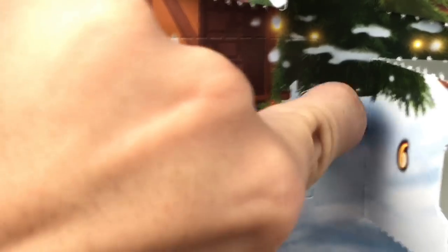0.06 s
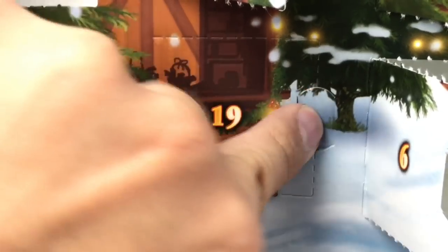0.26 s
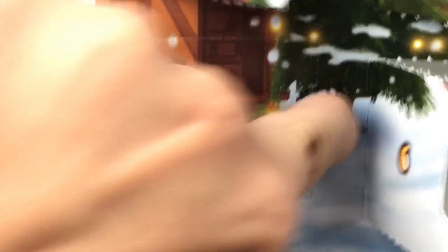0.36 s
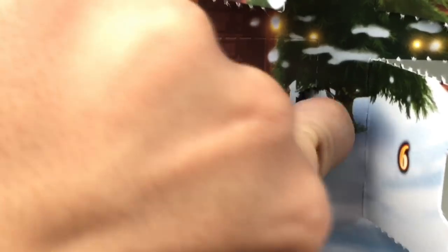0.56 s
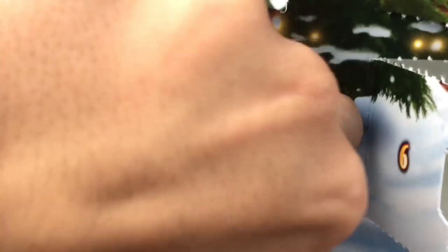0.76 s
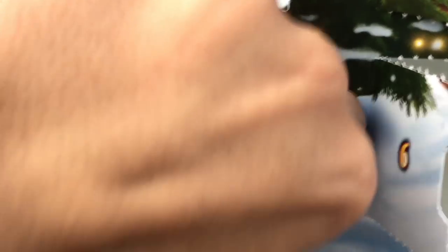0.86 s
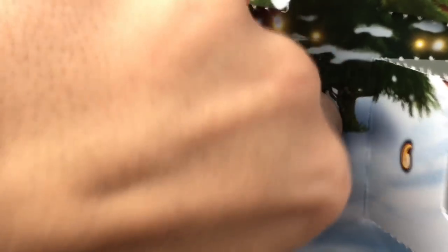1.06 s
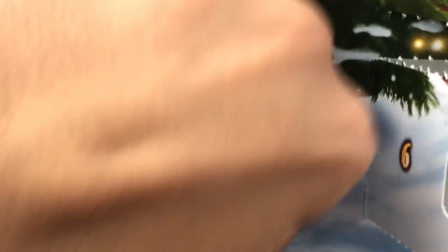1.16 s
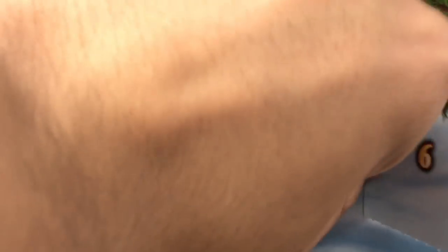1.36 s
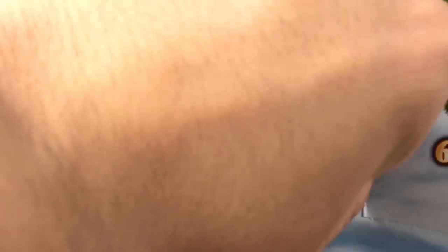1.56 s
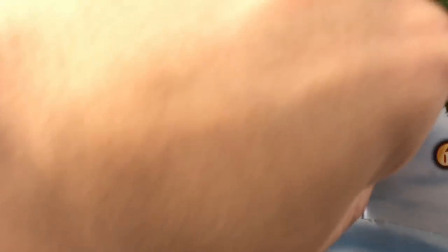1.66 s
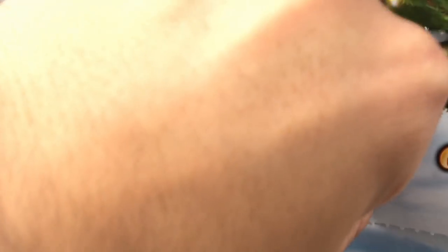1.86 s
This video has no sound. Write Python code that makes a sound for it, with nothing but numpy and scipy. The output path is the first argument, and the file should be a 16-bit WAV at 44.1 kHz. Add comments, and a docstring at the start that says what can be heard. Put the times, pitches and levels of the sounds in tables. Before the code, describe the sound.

Close, dry sound of a small cardboard door being pushed in on a hollow box; light rustling, popping card, quick snaps with dull knocks, a quieter lull, then a thick burst of papery crackles and scrapes in a quiet room.

```python
"""A thumb pushes in and tears open a perforated cardboard door on a hollow box, close to the microphone.
All along, a quiet room hisses, the hand rumbles and bumps on the box, and fibres rustle and crackle.
First the card pops over the hollow behind it, as ticks that set tuned tones ringing.
Then bridges of card snap: each gives a bright tick, and a moment later the flap thumps and the box rings.
After the snaps come a thick patch of crackles and a few more pops; card also scrapes on card now and then."""
import sys
import numpy as np
from scipy import signal
from scipy.fft import rfft, irfft
from scipy.io import wavfile

SR = 44100
rng = np.random.default_rng(int(sys.argv[2]) if len(sys.argv) > 2 else 0)


def int16_out(signal):
    """Quantize to a 16-bit WAV file."""
    q = np.round(np.clip(np.atleast_2d(signal).T, -1, 1) * 32767)
    wavfile.write(sys.argv[1], SR, q.astype(np.int16))


N = 83790  # length in samples


def from_db(db):
    """Turn a level in dB into a gain."""
    return 10 ** (np.asarray(db) / 20)


def rms_one(x):
    """Scale x to an rms (average strength) of 1."""
    return x / np.sqrt(np.mean(x ** 2) + 1e-20)


def curve(rows, column):
    """Join the points of one table column with straight lines, giving a value per sample."""
    rows = np.array(rows)
    return np.interp(np.arange(N) / SR, rows[:, 0], rows[:, column])


def coloured(x, spectrum):
    """Filter x by a spectrum, 60 dB down below its first row; rms 1."""
    hz, db = np.transpose(spectrum)
    log_hz = np.log(np.maximum(np.fft.rfftfreq(N, 1 / SR), 10))
    gain = from_db(np.interp(log_hz, np.log(hz), db, -60))
    return rms_one(irfft(rfft(x) * gain, N))


def band(x, low_hz, high_hz):
    """Keep the part of x between two frequencies."""
    edges = [low_hz, min(high_hz, .45 * SR)]
    return signal.sosfilt(signal.butter(2, edges, "band", fs=SR, output="sos"), x)


def ring(x, modes, turn=-1):
    """Let x strike a set of fading tones (modes), with alternating signs unless turn is 1."""
    out = 0
    for k, (hz, db, t60) in enumerate(modes):
        r = from_db(-60 / (t60 * SR))  # fade per sample
        w = 2 * np.pi * hz / SR
        tone = signal.lfilter([0, np.sin(w)], [1, -2 * r * np.cos(w), r * r], x + 1e-18)
        out = out + turn ** k * from_db(db) * tone
    return out


def clicks(s, db):
    """Place one-sample clicks at times s in seconds."""
    out = np.zeros(N)
    np.add.at(out, np.clip((s * SR).astype(int), 0, N - 1), from_db(db))
    return out


def splinters(s, db, ms):
    """Break card: a first click, then four at random times within ms, each 4 to 10 dB weaker."""
    draw = rng.random((len(s), 8))
    out = clicks(s, db)
    for k in range(4):
        later = s + draw[:, k] * np.abs(ms) / 1000
        out = out + (-1) ** k * clicks(later, db - 4.0 - 6 * draw[:, 4 + k])
    return out


def tail(s, db, t60):
    """Noise that starts at each time and fades by 60 dB in t60 seconds."""
    r = from_db(-120 / (t60 * SR))  # fade of the squared loudness per sample
    power = signal.lfilter([1], [1, -r], clicks(s, db) ** 2 + 1e-18)
    return np.sqrt(power) * rng.standard_normal(N)


def after_sound(s, tick_db, body_db):
    """Noisy after-sound of a break: a short bright tail and a longer dull one."""
    bright = tail(s, tick_db - 5, 0.048)
    dull = tail(s, body_db - 9.5, 0.11)
    return band(bright, 2500, 7400) + band(dull, 282, 1074)


def dying(s, db, t60):
    """Loudness that jumps up at each time and fades by 60 dB in t60 seconds."""
    t = np.arange(N) / SR
    return sum(np.where(t >= start, from_db(level - 60 * np.maximum(t - start, 0) / abs(fade)), 0)
               for start, level, fade in zip(s, db, t60))


def swelling(s, length, db):
    """Loudness made of smooth humps centred on times s."""
    t = np.arange(N) / SR
    return sum(from_db(level) * np.cos(np.pi * np.clip((t - middle) / width, -.5, .5)) ** 2
               for middle, width, level in zip(s, length, db))


# Colour of the room hiss. Each row: frequency in Hz, relative level in dB per Hz.
ROOM_COLOUR = [(18, -52), (30, -19), (239, -12.5), (336, 0), (844, 1.5), (1590, -14.5), (2350, -12.5),
               (3580, -14.5), (4530, -15), (14800, -23.5), (16000, -24)]


def room():
    """A quiet room: steady noise with a fixed colour."""
    return from_db(-61.5) * coloured(rng.standard_normal(N), ROOM_COLOUR)


# Loudness of the hand on the box. Each row: time in seconds, level in dB.
HAND_LOUDNESS = [(0.0, -52.5), (0.226, -51.5), (0.418, -46), (0.492, -47), (0.82, -51.5), (0.968, -49.5),
                 (1.058, -45), (1.232, -50.5), (1.418, -53), (1.592, -51), (1.9, -53)]


def handling():
    """The hand on the box: low noise whose loudness drifts."""
    rumble = rms_one(band(rng.standard_normal(N), 55, 245))
    return from_db(curve(HAND_LOUDNESS, 1)) * rumble


# Knuckle bumps. Each row: start in seconds, pitch in Hz, level in dB, time to fade by 60 dB in seconds.
KNUCKLE_BUMPS = [(0.111, 145, -29, 0.06), (0.251, 65.4, -26.5, 0.06), (0.296, 58.1, -34, 0.078),
                 (0.443, 67.5, -21.5, 0.064), (0.445, 235, -30.5, 0.059), (0.717, 70, -38, 0.075),
                 (1.047, 63, -33.5, 0.086), (1.1, 224, -29, 0.023), (1.151, 316, -32, 0.027),
                 (1.176, 156, -35, 0.13), (1.177, 235, -36, 0.14), (1.443, 242, -32.5, 0.033),
                 (1.59, 134, -29.5, .12), (1.595, 255, -31.5, 0.14)]


def bumps():
    """Knuckles bump the box: each soft knock is one low tone that fades."""
    return sum(ring(clicks(np.array([s]), db), [(hz, 0, t60)]) for s, hz, db, t60 in KNUCKLE_BUMPS)


# High tones of the card edge. Each row: pitch in Hz, level in dB, time to fade by 60 dB in seconds.
EDGE_TONES = [(3585, 1, 0.0082), (3990, 0, 0.0093), (5200, -9, 0.013), (5605, -3, 0.01),
              (6435, 0.5, 0.0067), (7080, -5.5, 0.0095), (8810, -1.5, 0.0031), (11240, -12.5, 0.0076),
              (12360, -11.5, 0.0096), (14600, -11.5, 0.0069)]


def ring_edge(x):
    """The card edge answers x with short, high tones."""
    return ring(x, EDGE_TONES)


# Tones of the hollow behind the door. Each row: pitch in Hz, level in dB, time to fade by 60 dB in seconds.
HOLLOW_TONES = [(2412, 5.5, 0.012), (2530, 5, .012), (3110, -1.5, 0.015), (3312, 2.5, 0.014),
                (4790, 6, 0.0044), (3533, 3.5, 0.012), (3876, 5.5, 0.013)]


def ring_hollow(x, part=slice(None), turn=-1):
    """The hollow answers x with all its tones, or only a part of them."""
    return ring(x, HOLLOW_TONES[part], turn)


# Tones of the door's body. Each row: pitch in Hz, level in dB, time to fade by 60 dB in seconds.
DOOR_TONES = [(578, 2, 0.026), (869, -1.5, 0.039), (962.4, 1, 0.031), (1125, 8, 0.0078), (1342, 1, 0.017),
              (1766, -0.5, 0.015)]


def ring_door(x):
    """The body of the door answers x with lower tones."""
    return ring(x, DOOR_TONES)


def fibre_grains():
    """Dense tiny clicks of uneven size and random sign, louder and softer in clumps."""
    per_second, spread_db, patchy_db, patch_ms = 12000, 3, 2, 3.2
    sizes = from_db(spread_db * np.minimum(rng.exponential(1, N), 5)) * rng.choice([-1, 1], N)
    slow = np.exp(-1000 / (patch_ms * SR))
    clumps = rms_one(signal.lfilter([1], [1, -slow], rng.standard_normal(N)))
    return sizes * (rng.random(N) < per_second / SR) * from_db(patchy_db * clumps)


# Colour of rubbing fibres. Each row: frequency in Hz, relative level in dB per Hz.
FIBRE_COLOUR = [(530, -38), (900, -8), (1420, -11), (1810, 0.5), (2300, -6), (2540, -1.5), (3550, -3),
                (4200, -4), (4570, -9.5), (6970, -8.5), (7770, -12), (16000, -13)]


def fibres(grains):
    """The grains as rubbing fibres, rms 1."""
    return coloured(grains, FIBRE_COLOUR)


# Colour of the duller noise of the card. Each row: frequency in Hz, relative level in dB per Hz.
CARD_COLOUR = [(120, -31), (200, 4), (481, 1), (681, 2), (757, -1), (1040, 0.5), (1490, -8.5),
               (1730, -11.5), (2500, -50)]


def dull_noise():
    """Smooth noise below the treble of the fibres, rms 1."""
    return coloured(rng.standard_normal(N), CARD_COLOUR)


def dull_rub(loudness, dull):
    """Shape the dull noise in time, then keep its middle frequencies."""
    return band(loudness * dull, 215, 2222.2)


def bright_rub(loudness, grains):
    """Grains heard as fibres and through the tones of the edge and the hollow."""
    edge, hollow = rms_one(ring_edge(grains)), rms_one(ring_hollow(grains))
    return loudness * (.5 * fibres(grains) + from_db(-10) * edge + from_db(-7.5) * hollow)


# Loudness of rubbing fibres. Each row: time in seconds, treble level in dB, middle level in dB.
FIBRE_LOUDNESS = [(0.0, -66, -47), (0.084, -68, -63.5), (0.29, -52.5, -63), (0.418, -55, -58),
                  (0.522, -52.5, -57), (0.612, -56, -57.5), (0.776, -53, -59), (0.904, -54.5, -53),
                  (1.036, -51, -49), (1.21, -57, -65.5), (1.412, -52, -53), (1.528, -56.5, -57),
                  (1.65, -58, -50.5), (1.766, -71, -65), (1.9, -56, -48)]


def rustle(grains, dull):
    """Fibres rub all the time: grains with a little of the hollow, and dull noise below."""
    rub = fibres(grains) + from_db(-28) * rms_one(ring_hollow(grains))
    treble = from_db(curve(FIBRE_LOUDNESS, 1)) * rub
    return treble + dull_rub(from_db(curve(FIBRE_LOUDNESS, 2)), dull)


# Card scraping on card. Each row: middle of the scrape in seconds, length in seconds,
# treble level in dB, middle-range level in dB, level of the edge's ring in dB.
CARD_SCRAPES = [(0.461, 0.11, -49.5, -43.5, -51.5), (1.038, 0.051, -39.5, -40.5, -47.5),
                (1.585, 0.028, -34.5, -55, -45), (1.612, 0.068, -36.5, -40, -61),
                (1.728, 0.049, -64, -45, -66), (1.368, 0.12, -62, -71, -61)]


def scrapes(grains, dull):
    """Card scrapes on card: bright and dull rubbing and a ringing edge swell and fade together."""
    s, length, treble_db, middle_db, edge_db = np.transpose(CARD_SCRAPES)
    edge = rms_one(band(rms_one(ring_edge(grains)), 5050, 6600))
    return (bright_rub(swelling(s, length, treble_db), grains)
            + dull_rub(swelling(s, length, middle_db), dull)
            + swelling(s, length, edge_db) * edge)


# Small crackles. Each row: start in seconds, treble level in dB, middle level in dB,
# basic fading time in seconds (the treble takes 0.7 of it, the middle 0.92, to fade by 60 dB).
SMALL_CRACKLES = [(0.015, -47.5, -40, 0.055), (.040, -46, -45.5, 0.015), (0.047, -52.5, -47, 0.22),
                  (0.111, -56.5, -43.5, 0.047), (0.218, -83, -46, 0.2), (.301, -41, -46.5, 0.015),
                  (0.38, -47, -35, 0.053), (0.404, -37.5, -42, 0.093), (0.425, -36, -58, 0.054),
                  (0.4359, -47, -21.5, 0.017), (.442, -31.5, -47, 0.033), (0.672, -47, -45, 0.018),
                  (0.956, -42.5, -64, 0.052), (1.007, -54, -40.5, 0.035), (1.133, -65, -43.5, 0.017),
                  (1.171, -46, -37, 0.088), (1.206, -38.5, -39.5, 0.043), (1.241, -50, -41.5, 0.024),
                  (1.28, -61, -42, 0.015), (1.435, -46, -32.5, 0.014), (1.443, -38, -32, 0.0095),
                  (1.447, -43, -35.5, 0.041), (1.458, -44, -37, 0.018), (1.463, -44, -44, 0.017),
                  (1.4695, -43, -38, 0.022), (1.476, -50, -48, 0.017), (1.501, -35, -35.5, 0.033),
                  (1.511, -41, -41, 0.064), (1.524, -32, -31, 0.03), (1.540, -42, -32.5, 0.036),
                  (1.5522, -37, -46, 0.048), (1.569, -43, -55, 0.027), (1.615, -38.5, -59, 0.034),
                  (1.661, -60, -42, 0.065), (1.7195, -41, -43, 0.02), (1.724, -38.5, -43, 0.023),
                  (1.734, -47.5, -48, 0.026), (1.794, -58, -46.5, 0.067), (1.825, -42, -37, 0.013),
                  (1.837, -54, -39, 0.066), (1.870, -49, -38, 0.016), (1.879, -44, -42, 0.024),
                  (1.891, -45, -52, 0.0092)]


def crackle_starts():
    """Each crackle begins with small breaks that strike the edge, the door and the hollow."""
    s, treble_db, middle_db, _ = np.transpose(SMALL_CRACKLES)
    edge = ring_edge(splinters(s, treble_db - 6, 1.3))
    door = ring_door(splinters(s, middle_db - 9, 2.2))
    hollow = ring_hollow(splinters(s, treble_db - 11.5, 1.9))
    return edge + door + hollow


def crackle_fades(grains, dull):
    """Each crackle goes on as bright and dull rubbing that dies away."""
    s, treble_db, middle_db, fade = np.transpose(SMALL_CRACKLES)
    bright = bright_rub(dying(s, treble_db, fade * 0.7), grains)
    return bright + dull_rub(dying(s, middle_db, fade * 0.92), dull)


# Pops over the hollow. Each row: start in seconds, tick level in dB, level in dB of the hollow's
# first five tones, of its sixth tone, of its seventh tone, level of the door's body in dB,
# length of the tick in milliseconds, delay of the ringing in milliseconds.
HOLLOW_POPS = [(0.2461, -21.5, -9, -18, -13, -17, 1.2, 1.23),
               (.4281, -21.5, -40, -9.5, -15, -22.5, 1.08, 0.2),
               (.4310, -27, -30, -16.5, -25.5, -30, 0.97, .058), (1.5858, -27, -25, -42, -44, -36, 4.7, .6),
               (1.6023, -25, -16.5, -43, -38, -25.5, 1.7, 1.07),
               (1.6072, -43, -28, -42, -50, -41, 2.1, 0.55)]


def pops():
    """The card pops over the hollow: a tick, then one blow rings the hollow and the door."""
    s, tick_db, five_db, sixth_db, seventh_db, body_db, ms, lag_ms = np.transpose(HOLLOW_POPS)
    late = s + lag_ms / 1000
    hollow = (ring_hollow(clicks(late, five_db), slice(0, 5), 1)
              + ring_hollow(clicks(late, sixth_db), slice(5, 6), 1)
              + ring_hollow(clicks(late, seventh_db), slice(6, 7), 1))
    hollow = band(band(hollow, 2790, 4440), 2790, 4440)  # twice, for steeper sides
    tick = ring_edge(splinters(s, tick_db, ms))
    door = ring_door(clicks(late, body_db))
    return tick + hollow + door + after_sound(late, np.maximum(five_db, seventh_db) - 5.5, body_db + 13)


# Low tones of the box. Each row: pitch in Hz, relative level in dB, time to fade by 60 dB in seconds.
BOX_TONES = [(242, 2.5, 0.03), (424, -3.5, 0.065), (503, 4.5, 0.015), (583, 7.5, 0.014), (639.5, -3, 0.07),
             (917, -3.5, 0.037), (1203, 2, 0.016), (1422, -2, 0.04), (830, -10, 0.026), (1715, -5.5, 0.02),
             (2215, -5.5, 0.043)]


def ring_box(x):
    """The hollow box answers x with its low tones."""
    return band(from_db(-36) * ring(x, BOX_TONES), 257, 4100)


# Snapping bridges of the perforation. Each row: start in seconds, tick level in dB, thump level in dB.
BRIDGE_SNAPS = [(.5299, -17.5, -5.5), (.5592, -19, -8), (.7093, -23, -8.5), (.7250, -24, -7.5),
                (.7426, -27, -9.5), (.8203, -18.5, -4.5), (.8462, -26.5, -8.5), (.8955, -24, -8),
                (.9713, -46, -16.5), (1.0977, -53, -32), (1.1485, -61.5, -24)]


def snaps():
    """A bridge snaps with a tick at the edge, then one inward thump of the flap sets off the box."""
    thump_lag_s, thump_width_s, rebound = .0023, .00023, .72
    s, tick_db, thump_db = np.transpose(BRIDGE_SNAPS)
    late = s + thump_lag_s
    push = clicks(late, thump_db)
    u = np.arange(-100, 101) / SR / thump_width_s  # time around the thump, in widths
    inward = (rebound * u ** 2 - 1) * np.exp(-u ** 2 / 2)  # a dip with a rise on each side
    thump = band(np.convolve(push, inward, "same"), 192, 7100)
    box = ring_box(np.convolve(push, np.exp(-2 * u ** 2), "same"))
    tick = ring_edge(splinters(s, tick_db, 1.05))
    return tick + thump + box + after_sound(late, tick_db, thump_db)


def scene():
    """Add up all sources in one channel; the rubbing sounds share the same grains and dull noise."""
    background = handling() + room() + bumps()
    breaks = snaps() + pops()
    grains, starts, dull = fibre_grains(), crackle_starts(), dull_noise()
    rubbing = rustle(grains, dull) + scrapes(grains, dull) + crackle_fades(grains, dull)
    return (background + breaks + starts + rubbing)[None]


def record(dry):
    """The microphone drops the deep bass below 41.6 Hz; the top is cut steeply towards 16.9 kHz."""
    dry = signal.sosfilt(signal.butter(2, 41.6, "high", fs=SR, output="sos"), dry)
    return signal.sosfilt(signal.cheby2(18, 115, 16900, fs=SR, output="sos"), dry)


dry = scene()
out = record(dry)
int16_out(out)
```